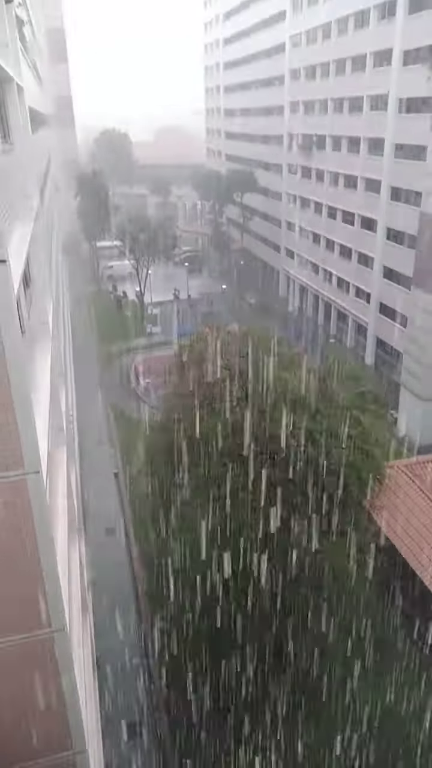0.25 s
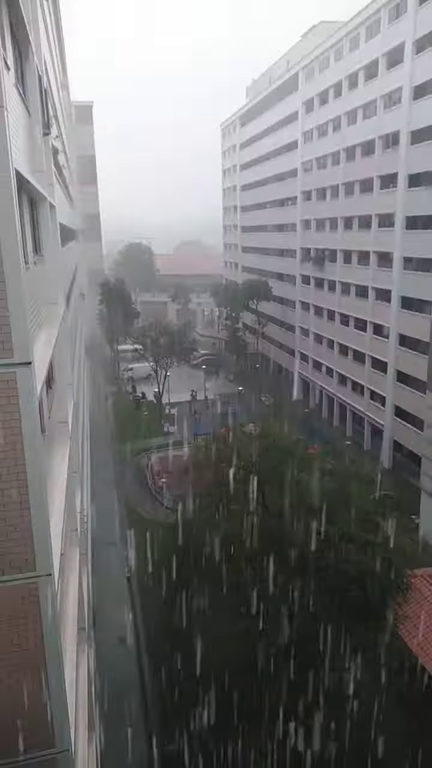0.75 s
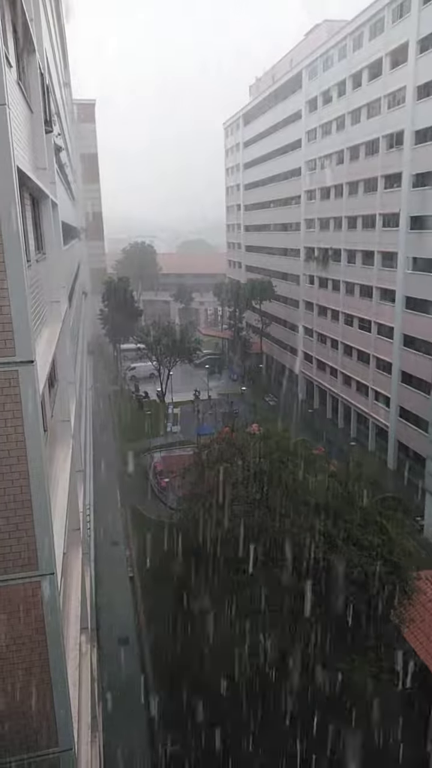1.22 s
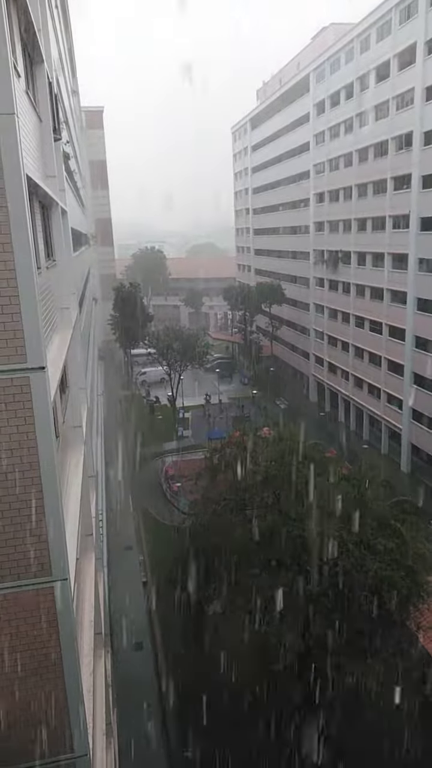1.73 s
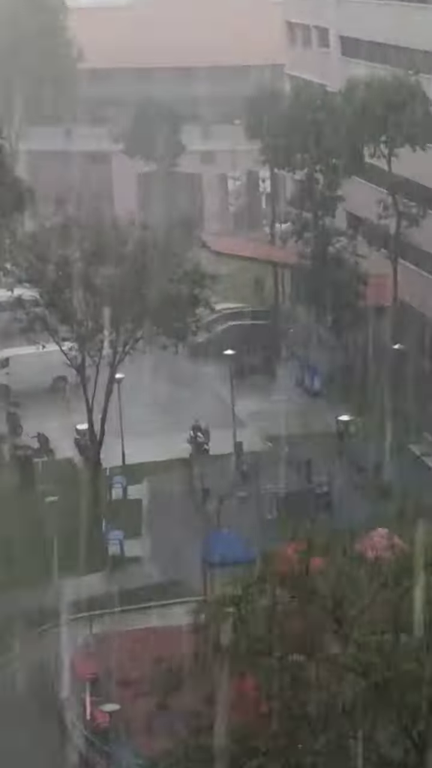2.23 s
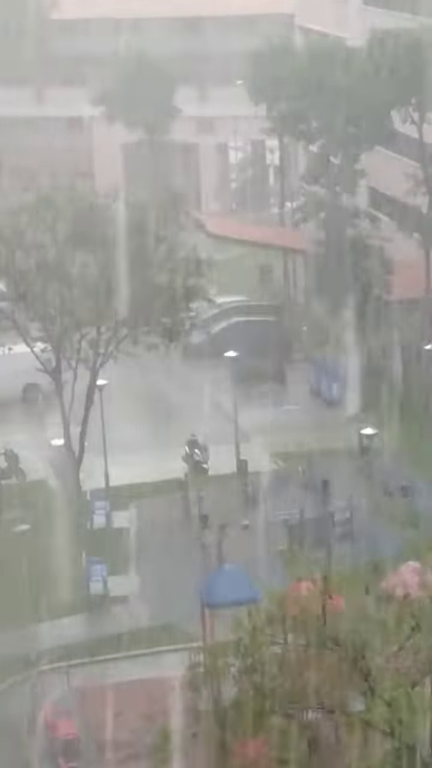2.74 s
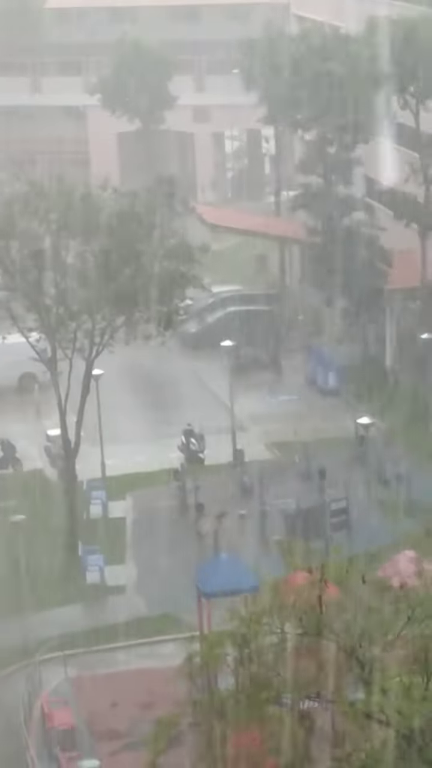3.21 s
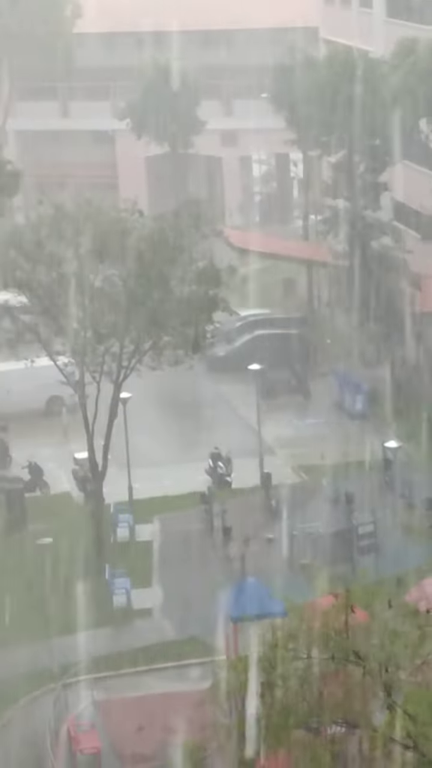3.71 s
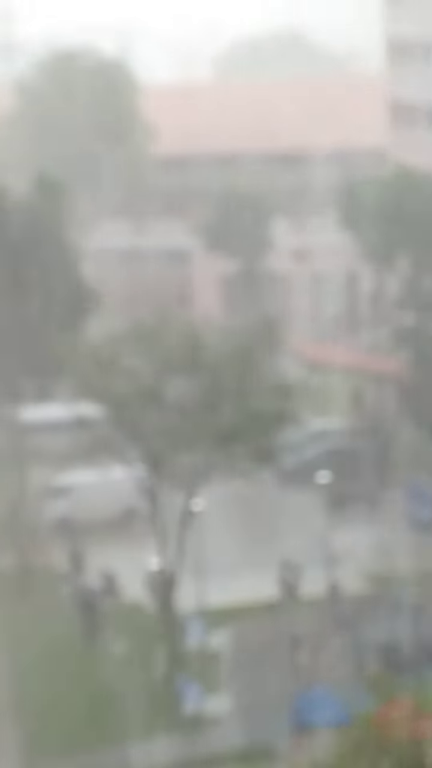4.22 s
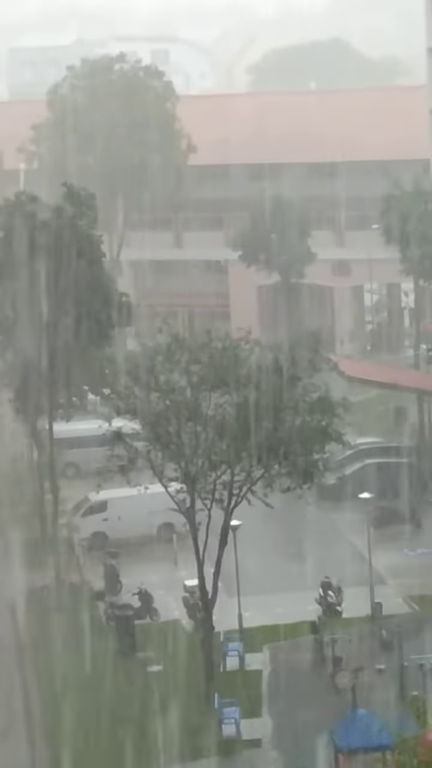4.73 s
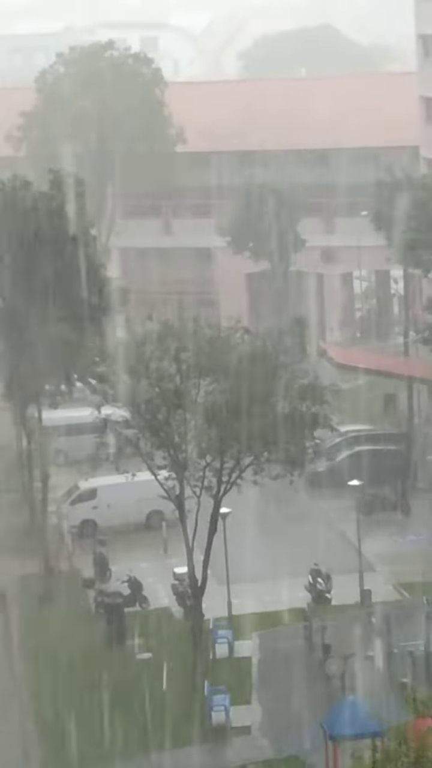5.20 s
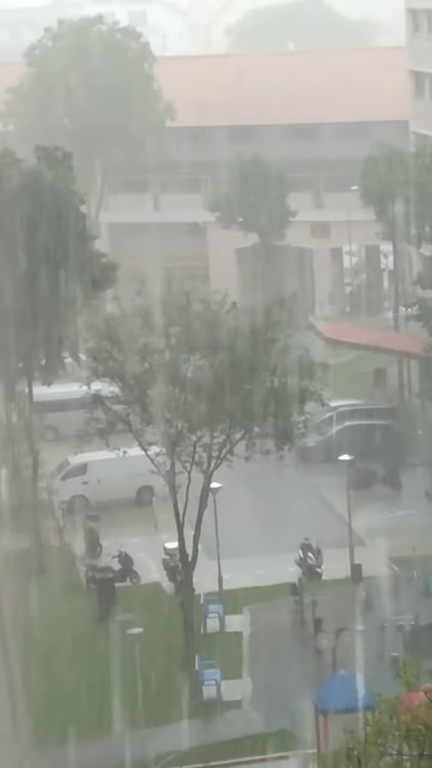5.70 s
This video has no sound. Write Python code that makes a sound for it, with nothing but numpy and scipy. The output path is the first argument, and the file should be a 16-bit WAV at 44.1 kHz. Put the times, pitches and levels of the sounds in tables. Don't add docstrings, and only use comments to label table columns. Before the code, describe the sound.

A torrential downpour heard from a high window: a dense, bright hiss of countless drops, loudest at first from nearby trees, with a wet ledge ringing faintly on the left. The rain eases slightly as the microphone turns away, while low wind buffeting grows. A few brief splashes pass close by, one a sharp slap past four seconds. Small stereo microphone, open outdoors, peaks slightly squashed.

```python
import sys
import numpy as np
from scipy import signal
from scipy.fft import rfft, irfft, next_fast_len
from scipy.io import wavfile
from scipy.ndimage import uniform_filter1d

SR = 44100
rng = np.random.default_rng(int(sys.argv[2]) if len(sys.argv) > 2 else 0)


def convert_level_to_amplitude(level_db):
    exponent = np.asarray(level_db, float) / 20
    return 10 ** exponent


def log_audio(samples):
    frames = np.atleast_2d(samples).T
    limited = np.clip(frames, -1, 1)
    pcm = np.round(limited * 32767).astype(np.int16)
    wavfile.write(sys.argv[1], SR, pcm)


N = 262395


def evened(x):
    return x / np.sqrt(np.mean(x ** 2, -1, keepdims=True) + 1e-20)


def curve(rows):
    seconds, value = np.transpose(rows)
    return np.interp(np.arange(N) / SR, seconds, value)


def read(points, hz):
    f, value = np.transpose(points)
    return np.interp(np.log(hz + 1), np.log(f + 1), value)


def coloured(x, points):
    size = next_fast_len(N)
    gain = convert_level_to_amplitude(read(points, np.fft.rfftfreq(size, 1 / SR)))
    return evened(irfft(rfft(x, size) * gain, size)[:N])


def wander(top_hz, low_hz):
    size = next_fast_len(N)
    hz = np.fft.rfftfreq(size, 1 / SR)
    shape = 1 / (1 + (hz / top_hz) ** 2) * hz / (hz + low_hz)
    return evened(irfft(rfft(rng.standard_normal(size)) * shape, size)[:N])


def sides(level_db, pan_db):
    share = convert_level_to_amplitude(pan_db + 0 * level_db) ** 2
    return 2 * convert_level_to_amplitude(level_db) * np.sqrt(np.array([share, np.ones_like(share)]) / (1 + share))


def ring(x, hz, width_hz):
    return signal.lfilter(*signal.iirpeak(hz, hz / width_hz, SR), x)


def drops(per_s, spread_db):
    size = convert_level_to_amplitude(spread_db * np.minimum(rng.exponential(1, N), 5))
    sign = np.sign(rng.standard_normal(N))
    return evened(size * sign * (rng.random(N) < per_s / SR))


def hiss(patchy_db, flicker_db):
    # frequency in Hz, factor on the depth of patches and flicker.
    patchiness = [(1000, 0.83), (3000, 1.86), (6000, 0.75), (9000, 0.47), (12000, 1.27)]
    frames = N // 64 + 5
    real, imaginary, patches, wide = rng.standard_normal((frames, 129, 4)).T
    patches = uniform_filter1d(uniform_filter1d(patches, size=2, axis=0), size=24, axis=1)
    wide = uniform_filter1d(uniform_filter1d(wide, size=40, axis=0), size=12, axis=1)
    field_db = patchy_db * patches / patches.std() + flicker_db * wide / wide.std()
    field_db = field_db * read(patchiness, np.fft.rfftfreq(256, 1 / SR))[:, None]
    spectrum = (real + 1j * imaginary) * convert_level_to_amplitude(field_db)
    return evened(signal.istft(spectrum, nperseg=256, noverlap=192)[1][:N])


def rain():
    # time in seconds, level in dB.
    rain_level = [(0, -13.5), (.7, -14.5), (1.4, -15), (2.2, -16), (2.7, -16.5), (4.2, -16.5), (5.95, -17)]
    # frequency in Hz, level in dB per Hz.
    rain_colour = [
        [(300, -5), (800, -3.5), (1300, -4), (2000, -2), (2600, -2), (3100, -5), (3700, -4.5), (4500, 1),
         (6000, 0), (9500, -0.5), (11000, -5), (14000, -5), (16000, -53)],
        [(300, -5), (800, 1.5), (1100, -4.5), (1600, -5.5), (2100, 1.5), (2700, -4), (3700, -1.5), (4500, 1),
         (6000, 2), (9000, -0.5), (11000, 0), (14000, -10), (16000, -29)],
    ]
    # centre in Hz, width in Hz, level in dB.
    cavities = [
        (8070, 1220, 14),
        (7134, 680, 15),
    ]
    near_trees_db, dull_hz, dull_per_db = -13, 10100, 1.2
    sheets_db = 0.4 * wander(top_hz=30, low_hz=15)
    level_db = curve(rain_level)
    away_db = level_db - near_trees_db
    ports = []
    for colour, (hz, width_hz, ring_db) in zip(rain_colour, cavities):
        spatter = rng.standard_normal(120) * np.exp(-np.arange(120) / 21.0)
        near = evened(signal.oaconvolve(drops(per_s=900, spread_db=6.5), spatter)[:N])
        far = hiss(patchy_db=1.62, flicker_db=2.18)
        x = coloured(far + convert_level_to_amplitude(-7.0) * near, colour)
        x = x + convert_level_to_amplitude(ring_db) * ring(x, hz, width_hz)
        top = signal.oaconvolve(x, signal.firwin(63, dull_hz, pass_zero=False, fs=SR), "same")
        dulled = x + top * (convert_level_to_amplitude(dull_per_db * away_db) - 1)
        ports.append(evened(dulled) * convert_level_to_amplitude(sheets_db))
    pan_db = 1.05 - 1.09 * away_db
    return sides(level_db, pan_db) * np.array(ports)


def wind():
    # time in seconds, level in dB.
    strength = [(0, -24), (.2, -21), (.4, -20.5), (.9, -17.5), (1.45, -17.5), (1.85, -15.5), (2.05, -16),
                (2.5, -15.5), (3.1, -17), (3.45, -14), (3.85, -14), (4.15, -14), (4.5, -15.5), (4.9, -14.5),
                (5.3, -14.5), (5.95, -12.5)]
    # time in seconds, fast eddies in dB.
    squareness = [(0, 0), (1, -1), (2, -0.2), (3, 1.8), (3.9, -0.66), (4.6, 1.5), (5.3, 0.8), (5.95, -0.43)]
    # frequency in Hz, level in dB per Hz.
    rumble_colour = [(20, -40), (40, -35), (60, -8), (90, -1.5), (130, -0.5), (200, -5.5), (300, -14.5),
                     (450, -52.5)]
    # frequency in Hz, level in dB per Hz.
    eddy_colour = [
        [(100, -25), (200, 0), (300, -2), (400, -6.5), (550, -9.5), (700, -12.5), (900, -23.5), (1300, -34),
         (2000, -39.5)],
        [(100, -16), (200, 0.5), (300, 2.5), (400, -3), (550, -11.5), (700, -14), (900, -26), (1300, -22),
         (2000, -68)],
    ]
    rumble_db = curve(strength)
    eddy_db = -4.5 + 0.58 * (rumble_db + 16) + curve(squareness)
    slow_band = signal.butter(2, 380, fs=SR, output="sos")
    rumble, eddies = [], []
    for colour, burst_db in zip(eddy_colour, (4.6, 6.1)):
        gust = 2.7 * np.tanh(wander(top_hz=54, low_hz=4.8) / 2.83)
        lull = convert_level_to_amplitude(2.5 * wander(top_hz=11.7, low_hz=7))
        rumble.append(evened(coloured(rng.standard_normal(N), rumble_colour) * convert_level_to_amplitude(1.33 * gust)))
        flow = coloured(rng.standard_normal(N), colour)
        slow = signal.sosfilt(slow_band, flow)
        fast = flow - slow
        burst = slow * convert_level_to_amplitude(0.91 * burst_db * gust) + convert_level_to_amplitude(-2.5) * fast * convert_level_to_amplitude(burst_db * gust)
        eddies.append(evened(lull * burst))
    low = sides(rumble_db - 0.8, pan_db=-2.4) * np.array(rumble)
    return low + sides(rumble_db + eddy_db + 1.62, pan_db=3) * np.array(eddies)


def splashes():
    # start in seconds, level in dB, length in seconds, centre in Hz, left minus right in dB.
    falls = [
        (0.722, -25.5, 0.057, 1110, 2),
        (1.344, -29, 0.034, 1300, 8),
        (1.708, -25.5, .04, 1610, 2),
        (2.787, -25, 0.01, 1200, 10),
        (4.392, -19.5, 0.013, 2480, 0),
        (5.583, -25, 0.066, 1060, 6),
    ]
    t, out = np.arange(N) / SR, np.zeros((2, N))
    for start, db, length, hz, pan_db in falls:
        u = np.maximum(t - start, 0) / length
        shape = np.minimum(u * 6, 1) * np.exp(-u ** 2)
        shared = rng.standard_normal(N)
        own = rng.standard_normal((2, N))
        spray = evened(ring(shared + own, hz, 0.56 * hz))
        out += convert_level_to_amplitude(db + np.array([[pan_db / 2], [-pan_db / 2]])) * spray * shape
    return out


def ledge():
    # time in seconds, level in dB.
    ledge_level = [(0, -25.5), (.5, -31), (1, -30), (1.5, -61), (3, -96), (5.95, -74)]
    hz, width_hz = 2660, 400
    taps = drops(per_s=2600, spread_db=7.0)
    taps = ring(ring(taps, hz, width_hz), hz, width_hz)
    return evened(taps) * convert_level_to_amplitude(curve(ledge_level)) * convert_level_to_amplitude(np.array([[0], [-9.0]]))


def scene():
    return rain() + wind() + splashes() + ledge()


def top_cut(x):
    return signal.sosfilt(signal.butter(12, 14250, fs=SR, output="sos"), x)


def record(dry):
    knee, room = 0.65, 0.25
    over = np.maximum(abs(dry) - knee, 0)
    squeezed = np.sign(dry) * (np.minimum(abs(dry), knee) + room * np.tanh(over / room))
    return top_cut(squeezed)


dry = scene()
out = record(dry)
log_audio(out)
```